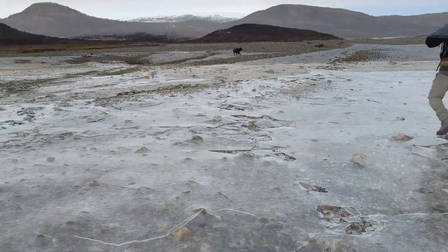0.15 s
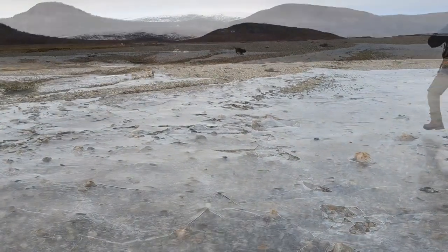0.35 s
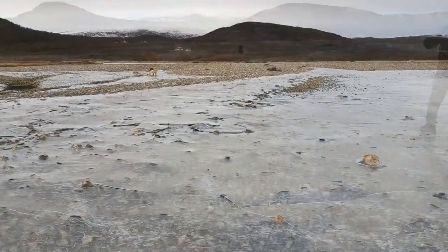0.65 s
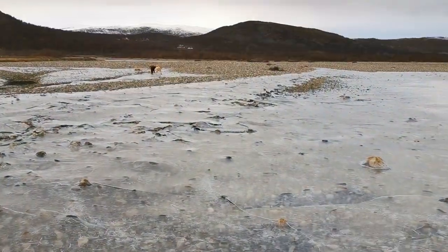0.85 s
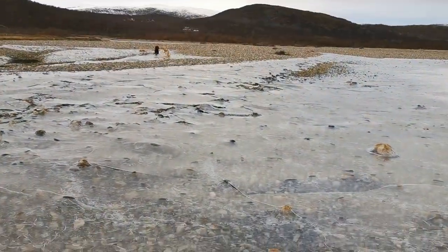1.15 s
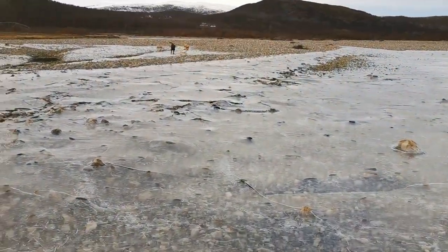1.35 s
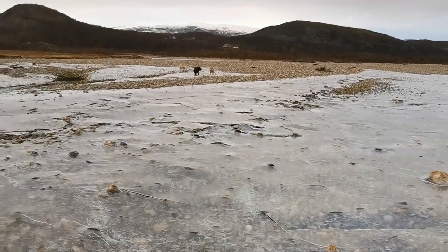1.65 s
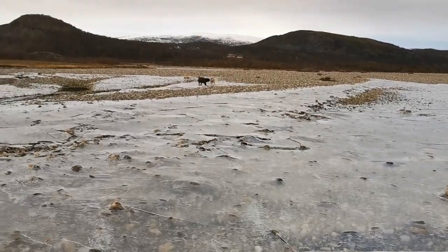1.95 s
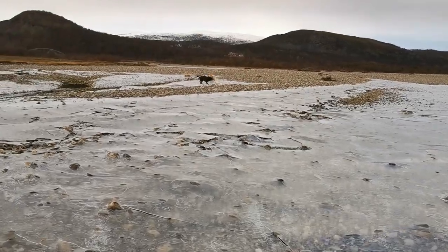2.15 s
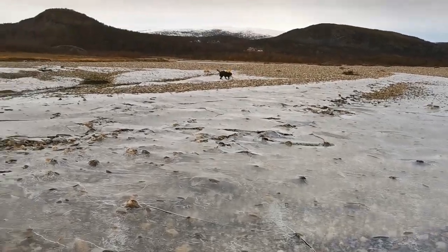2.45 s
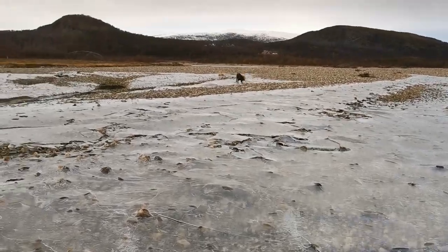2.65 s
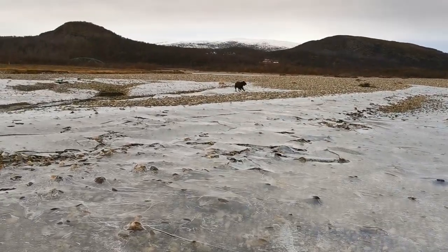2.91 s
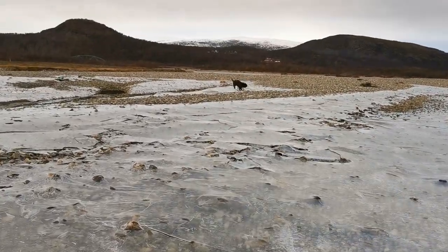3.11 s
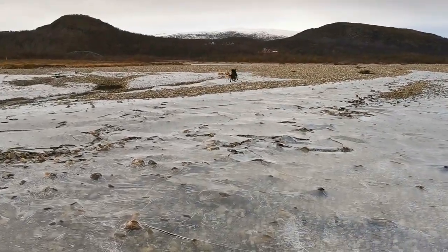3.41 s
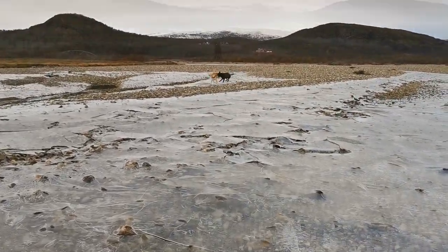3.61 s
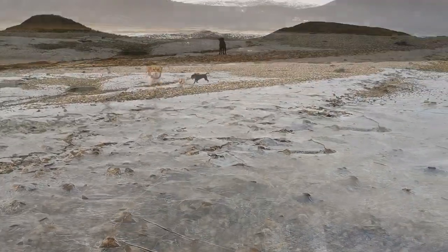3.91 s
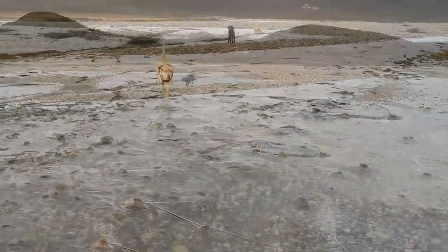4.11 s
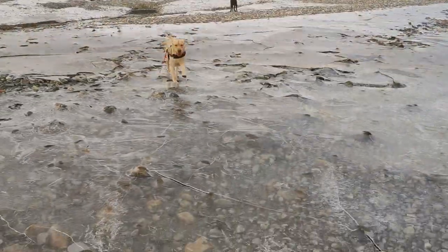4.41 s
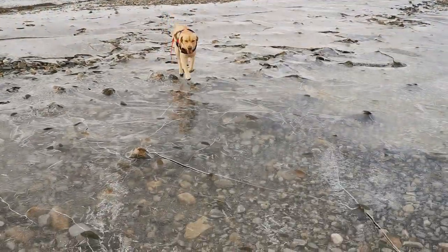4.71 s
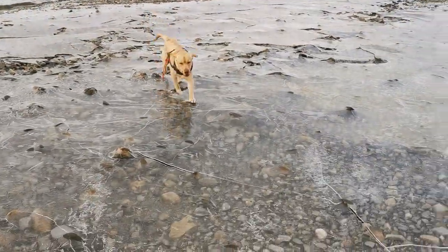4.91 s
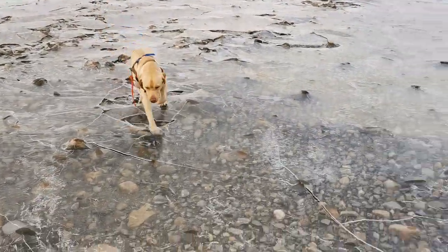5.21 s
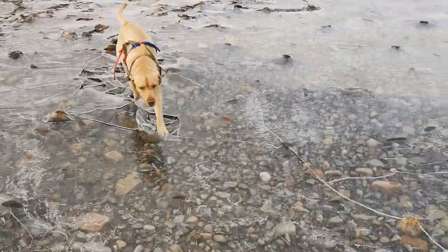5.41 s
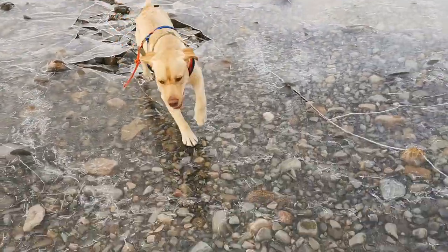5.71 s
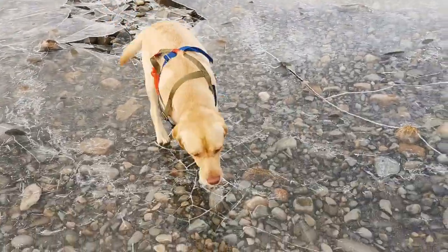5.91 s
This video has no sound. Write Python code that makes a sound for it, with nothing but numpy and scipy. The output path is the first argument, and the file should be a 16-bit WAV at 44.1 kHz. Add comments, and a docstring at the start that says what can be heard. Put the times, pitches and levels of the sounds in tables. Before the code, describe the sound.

On an open river flat, sharp ice snaps and slow crunching treads give way to lighter, brittle, ringing pawsteps breaking through the sheet.

```python
"""On an open river flat, boots break through thin shell ice; then a dog trots over it, cracking it with its paws.
Each break is a snap of noise, a thud of fading sine waves and a low boom from the hollow under the sheet.
Crushed ice is thousands of random ticks and tiny ringing chips, louder whenever a foot presses down.
High noise fizzes, splinters tick, water gulps, and a light wind brushes a hand-held camera's two microphone ports."""
import sys
import numpy as np
from scipy import signal
from scipy.fft import rfft, irfft, next_fast_len
from scipy.io import wavfile
from scipy.ndimage import uniform_filter1d, map_coordinates

SR = 44100
rng = np.random.default_rng(int(sys.argv[2]) if len(sys.argv) > 2 else 0)


def file_out(sig):
    """Save sig as 16-bit WAV at sys.argv[1]."""
    # one column per channel
    cols = np.atleast_2d(sig).T
    # limit, then scale
    lim = np.clip(cols, -1, 1)
    pcm = np.round(lim * 32767).astype(np.int16)
    wavfile.write(sys.argv[1], SR, pcm)


N = 267246  # length in samples

# The sheet gives way: t/s, relative thud level/dB, f/Hz, boom of the hollow relative to the thud/dB
BREAKS = [(0.068, -38.5, 99, 11.5), (0.388, -27.5, 270, -18), (1.347, -8.5, 294, -1.5),
          (1.839, -14.5, 174, -17), (2.109, -18, 242, -11), (2.212, -25.5, 230, -14),
          (2.239, -21.5, 205, -16), (2.408, -14, 189, -13), (3.449, -9.5, 269, -5), (3.507, -14, 153, -7),
          (4.927, -25, 223, -34), (5.036, -22.5, 197, -24), (5.07, -23, 176, -22), (5.321, -26, 281, -22),
          (5.5, -24, 264, -17), (5.719, -21.5, 156, -11), (5.767, -23.5, 209, -6), (5.804, -29, 113, -11),
          (5.893, -21.5, 296, 0.5), (5.986, -17, 153.6, -27)]
# Single cracks, loud and faint: t/s, relative level/dB, f/Hz of the broken piece
CRACKS = [(0.223, -28.5, 1410), (0.454, -22, 705), (0.672, -26, 4230), (0.712, -24, 2140),
          (0.833, -23.5, 1380), (0.873, -26, 1000), (1.26, -25.5, 1280), (1.293, -25.5, 1400),
          (1.324, -24, 1570), (1.347, -8.5, 4200), (1.364, -17.5, 520), (1.377, -9, 1190),
          (1.434, -18, 3670), (1.455, -13, 1950), (1.607, -18, 1090), (1.669, -23, 1180),
          (1.772, -24, 2260), (1.84, -9.5, 3880), (1.8555, -14.5, 3020), (1.865, -11.5, 4010),
          (1.8745, -11.5, 3900), (1.927, -14, 3150), (1.955, -21, 4300), (2.043, -21.5, 1450),
          (2.108, -18.5, 4040), (2.212, -25.5, 3950), (2.282, -26, 1080), (2.353, -23, 1420),
          (2.407, -16, 680), (2.434, -11, 1020), (2.467, -16.5, 1570), (2.575, -26, 2900),
          (2.668, -24.5, 810), (2.712, -19.5, 3240), (2.74, -30, 3340), (2.802, -25.5, 2170),
          (2.906, -26.5, 880), (3.005, -24.5, 2520), (3.116, -36, 2720), (3.147, -29.5, 3560),
          (3.247, -34.5, 3960), (3.406, -24.5, 3470), (3.468, -16, 4250), (3.517, -14, 436),
          (3.512, -16, 2430), (3.549, -17, 1290), (3.599, -15, 4050), (3.669, -21, 3800),
          (3.696, -16, 4460), (3.736, -22.5, 2510), (3.882, -28, 2160), (3.896, -26, 2570),
          (4.075, -31, 2560), (4.1, -38, 4470), (4.42, -30, 3360), (4.516, -29, 4770), (4.635, -26, 4640),
          (4.925, -19, 4030), (4.978, -22, 4200), (5.034, -23, 3030), (5.071, -21.5, 3920),
          (5.115, -21, 4130), (5.14, -22.5, 1110), (5.175, -23, 2090), (5.247, -16.5, 3100),
          (5.288, -21.5, 2980), (5.42, -21.5, 2100), (5.323, -14, 3380), (5.365, -17, 3250),
          (5.379, -19.5, 2330), (5.513, -16.5, 3660), (5.535, -20, 3860), (5.565, -24, 3150),
          (5.615, -15.5, 3300), (5.646, -24, 3290), (5.716, -13.5, 3940), (5.795, -19.5, 4400),
          (5.817, -20, 3930), (5.873, -13.5, 4430), (5.932, -24, 4880), (5.965, -18, 4520)]
# Ways the sheet bends and rings: multiple of the break's f, level/dB
SHEET_MODES = [(0.552, -26), (1.002, 9), (1.499, 3.5), (2.1, -4), (3.2, -5)]
# Tone colour of ice under a boot: f/Hz, relative level/dB
BOOT_ICE = [(200, -11.5), (390, -5.5), (1600, -5.5), (2200, -7.5), (3200, -5.5), (4600, -4), (5600, -13),
            (7500, -21.5), (9700, -35), (12000, -31.5), (16000, -36)]
# Tone colour of ice under a paw: f/Hz, relative level/dB
PAW_ICE = [(200, -20), (400, -13.5), (540, 1), (820, -7.5), (1120, -1.5), (1600, -5), (2100, -2.5),
           (3300, 0.5), (4600, 4.5), (5500, -8), (7500, -16.5), (9500, -26), (12000, -21), (16000, -32.5)]
# Tone colour of plates rocking over the hollow: f/Hz, relative level/dB
HOLLOW = [(25, -24.5), (70, -13), (115, -1), (200, 1), (290, 2), (380, -3.5), (550, -14), (1000, -47.5)]
# Tone colour of the quiet air: f/Hz, relative level/dB
AIR = [(35, -32), (60, 0), (301, 1), (417, -7), (1000, -8.5), (4030, -10.5), (8510, -31), (16000, -30)]
# Tone colour of rime, the crust of frost: f/Hz, relative level/dB
RIME = [(3000, -17), (4800, 3.5), (8500, -2.5), (10500, -4.5), (15500, -8.5)]
# Tone colour of flying splinters: f/Hz, relative level/dB
SPRAY = [(9000, 7.8), (11500, 2.8), (16000, 1.5)]
# Tone colour of wind on the ports: f/Hz, relative level/dB
BUFFET = [(15, -6.5), (40, -1), (140, -15.5), (400, -92)]
# How alike left and right sound: f/Hz, likeness 0-1
ALIKE = [(300, .99), (1200, .94), (2200, .62), (6000, .3), (14000, .2)]
# Balance of the boots' side: f/Hz, left minus right level/dB
BOOT_SIDE = [(700, 3.3), (1100, 0), (1800, -6.5), (2400, -5), (3600, -9), (5500, -5), (7000, -6), (9500, 0)]
# Balance of the dog's side: f/Hz, left minus right level/dB
PAW_SIDE = [(400, -2.5), (1700, -2), (2500, -4.5), (4500, -10), (7500, -7.5), (11000, -2)]
# Echo off the person holding the camera: t/s, delay/ms, strength 0-1
BODY_ECHO = [(3.7, 1.02, .2), (4.3, 1, .24), (5.3, .84, .18)]
# A foot bears down on the rubble: t/s, relative crunch level/dB, time from touch to release/s,
# time to fade 60 dB/s, relative level of rocking plates/dB, treble minus bass/dB
TREADS = [(0.001, -47, 0.046, 0.25, -59, -6), (0.315, -51, 0.0072, 0.27, -58, 1),
          (0.392, -38, 0.14, 0.069, -32.5, 2), (0.465, -28.5, 0.072, 0.65, -45, -1.5),
          (0.661, -32, 0.062, 0.2, -41, 1), (0.822, -39, 0.018, 0.57, -41, -6.5),
          (0.951, -51.5, 0.078, 0.46, -59, 4.5), (1.081, -58, 0.29, 0.28, -46.5, -7),
          (1.343, -23, 0.068, 0.061, -26.5, 2), (1.427, -29.5, 0.015, 0.7, -42, -7),
          (1.525, -34, 0.11, 0.38, -43, 2), (1.839, -19, 0.0065, 0.22, -31, -8),
          (1.905, -31, 0.023, 0.65, -58, -2), (2.103, -32.5, 0.016, 0.19, -34.5, -0.5),
          (2.209, -33, 0.011, .15, -29.5, -6), (2.276, -43.5, 0.0068, 0.74, -44, 0),
          (2.406, -24.5, 0.0065, 0.11, -24, -1), (2.435, -23, 0.04, 0.19, -49, -5.5),
          (2.663, -32, 0.029, 0.25, -38, -0.5), (2.887, -40, 0.065, 0.17, -43, 2.5),
          (3.399, -40, 0.0091, 0.063, -48, -4), (3.448, -28, 0.029, 0.19, -23.5, 0.5),
          (3.508, -26, 0.1, 0.088, -34.5, -5), (3.638, -37.5, 0.015, 0.47, -47, 1),
          (3.856, -42.5, 0.026, 0.24, -49, 10.5), (4.02, -41, 0.018, 1.8, -61, 2.5),
          (4.133, -38.5, 0.027, 0.11, -58, 1.5), (4.191, -40, 0.059, 0.54, -82, -1),
          (4.292, -46, 0.081, 0.18, -83, -1), (4.422, -41, 0.025, 0.39, -64, -10),
          (4.495, -37, 0.078, 0.93, -54.5, -8), (4.629, -37.5, 0.1, 0.23, -52, -10),
          (4.867, -37.5, 0.041, .45, -72, -4), (4.923, -34.5, 0.032, 0.77, -46.5, 2),
          (5.029, -30.5, 0.18, 0.34, -39.5, -2), (5.255, -27.5, 0.062, 0.42, -42.5, -3.5),
          (5.322, -31, 0.042, 0.14, -37, 4), (5.364, -26, 0.026, 0.76, -60, -5),
          (5.496, -25.5, 0.04, 0.53, -37, -1), (5.597, -26.5, 0.08, 0.22, -58, -3.5),
          (5.709, -30.5, 0.01, 0.31, -42, -3), (5.751, -35.5, 0.14, 0.47, -40.5, 1.5),
          (5.878, -28, 0.022, 0.11, -27.5, -2), (5.961, -34.5, 0.028, 0.6, -36.5, -11.5)]
# A fizz of high noise swells and fades: t/s, level/dB, rise/s, time from start to release/s,
# time to fade 60 dB/s, f/Hz of the middle of the fizz hump
FIZZES = [(0.008, -52.5, 0.0056, 0.034, 0.5, 7600), (0.386, -59, 0.016, 0.12, 0.38, 12600),
          (0.478, -44, 0.059, 0.082, 0.1, 6200), (0.571, -45.5, 0.01, 0.12, 0.24, 7700),
          (4.137, -59.5, 0.081, 0.083, 0.61, 12500), (4.493, -51.5, 0.0052, 0.027, 0.21, 12800),
          (5.787, -35, 0.012, 0.03, 0.19, 5500), (5.863, -25.5, 0.0047, 0.036, 0.071, 5260),
          (5.961, -28, 0.0027, 0.036, 0.14, 5200)]
# Puffs of wind: t/s of the peak, relative level/dB
PUFFS = [(0.075, -47), (0.55, -47), (3.85, -43.5), (4.259, -44), (4.59, -51)]
# Water gulps under the broken sheet: t/s, relative level/dB, starting f/Hz
GULPS = [(2.482, -20, 794), (2.548, -22, 816), (3.603, -18.5, 756), (3.705, -27, 1370)]
# Tiny crystals snap off the rime: t/s, peak level/dB
PINS = [(0.024, -35), (0.047, -40), (0.079, -36), (0.142, -36.5), (0.182, -46), (2.909, -30),
        (4.637, -27.5), (4.87, -30.5)]
# Resonances of the whole plate that the dog first crosses: f/Hz, level/dB
FAR_PLATE = [(1140, 3.5), (2080, -2), (2760, -2.5), (3540, -8.5)]

# Names ending in T60 or t60 are the seconds a sound takes to fade by 60 dB.
DOG_ENTERS, LEAVES_PLATE_S = 4.02, 4.84  # s: the dog's first step; it leaves the first plate
PRESS_S = 0.0053  # s for the weight to come on
SETTLE_DB, SETTLE_T60 = -15.5, 1  # shards keep shifting after each tread
CROSSFADE_DB = -28  # the load at which the two crushed-ice textures are mixed equally
ROCK_RISE_S, ROCK_HOLD, ROCK_RELEASE = 0.0035, 0.54, 2.13  # the last two multiply the tread's own times
BOOM_HZ, SHEET_LOW_HZ = 117.4, 71  # the air pocket; the sheet radiates little below the second
PIN_T60, SPRAY_DB, SPRAY_T60 = 0.017, -27, 0.099
FIZZ_DB, FIZZ_WIDTH_OCTAVES = 15, 0.47  # height and half-width of the fizz hump
PUFF_S, BREEZE_DB = 0.098, -59.5  # half-width of a puff; relative level of the breeze between puffs
LAG_FROM_HZ = 970  # deeper sounds reach both ports together
MIC_LOW_HZ, TOP_HZ = 30.2, 16000  # bass roll-off and upper limit


def boots():
    """Heavy, slow treads close to the camera break the sheet and crush its pieces."""
    treads, sheet_breaks, snaps = ([r for r in rows if r[0] < DOG_ENTERS] for rows in (TREADS, BREAKS, CRACKS))
    sparse = rubble(BOOT_ICE, rate=600, spread_db=4.5, chip_db=-6)
    dense = rubble(BOOT_ICE, rate=2000, spread_db=3.8, chip_db=-6)
    sound = crunch(treads, sparse, dense, db=0)
    sound += gulps(t60=0.042, attack_s=0.0013, glide_per_s=2.05)
    sound += strays(treads, BOOT_ICE, db=-17.0, rate=36, t60=0.93)
    sound += breaks(sheet_breaks, thud_db=-2, thud_t60=0.052, attack_s=0.0015, boom_t60=0.081)
    sound += slabs(sheet_breaks, db=-24, hold_s=0.026, t60=0.16)
    sound += cracks(snaps, BOOT_ICE, gain_db=3, rise_s=.0003, snap_t60=.008, tail_t60=.03,
                    ring_db=-4.5, ring_q=6)
    return ports(sound, BOOT_SIDE, lag_ms=0.071)


def dog():
    """Quick, light paws, heard first on the left: brittle rubble with narrow, shifting resonances."""
    treads, sheet_breaks, snaps = ([r for r in rows if r[0] >= DOG_ENTERS] for rows in (TREADS, BREAKS, CRACKS))
    fine = rubble(PAW_ICE, rate=1500, spread_db=3.3, chip_db=-4)
    coarse = rubble(PAW_ICE, rate=600, spread_db=4, chip_db=-4)
    both = patches(np.vstack([fine, coarse]), depth_db=3.2, size=768, count=24)
    fine, coarse = both.reshape(2, 2, N)
    sound = far_plate(crunch(treads, fine, coarse, db=-1.0), direct_db=-2.5, q=10.8)
    sound += cracks(snaps, PAW_ICE, gain_db=4.5, rise_s=.001, snap_t60=.03, tail_t60=.08,
                    ring_db=-4.5, ring_q=12)
    sound += breaks(sheet_breaks, thud_db=-2.0, thud_t60=0.11, attack_s=0.0033, boom_t60=0.38)
    return ports(sound, PAW_SIDE, lag_ms=-0.34)


def breaks(rows, thud_db, thud_t60, attack_s, boom_t60):
    """The sheet drops, rings as it bends and pumps the air pocket beneath it."""
    thuds, t = np.zeros((2, N)), np.arange(SR // 3) / SR
    onset = 1 - np.exp(-t / attack_s)  # a hard sole drops the sheet at once, a soft paw more gently
    for s, db, hz, boom_db in rows:
        ring = np.zeros(len(t))
        for k, level in SHEET_MODES:
            fade = amp(level + rng.normal(0, 1) - 60 * t * np.sqrt(k) / thud_t60)  # high modes die sooner
            ring += onset * fade * np.sin(2 * np.pi * hz * k * t)
        boom = onset * amp(boom_db - 60 * t / boom_t60) * np.sin(2 * np.pi * BOOM_HZ * t)
        add(thuds, s, -amp(db + thud_db) * (ring / np.abs(ring).max() + boom) * [[1], [0]])
    return filtered(thuds, lambda hz: 1j * hz / (SHEET_LOW_HZ + 1j * hz))


def cracks(rows, spectrum, gain_db, rise_s, snap_t60, tail_t60, ring_db, ring_q):
    """A crack is a sharp snap and a scatter across the sheet, both resonating in the broken piece."""
    out, t = np.zeros((2, N)), np.arange(SR // 12) / SR
    for s, db, hz in rows:
        scatter = amp(.5 * db - 60 * t / tail_t60)  # small cracks stay dry, big ones scatter
        force = np.minimum(t / rise_s, 1) * (amp(-60 * t / snap_t60) + scatter)
        snap = coloured(rng.standard_normal((2, len(t))) * force, spectrum)
        ring = unit(signal.lfilter(*signal.iirpeak(hz, ring_q, SR), snap))
        sound = unit(snap) + amp(ring_db - .3 * db) * ring  # small pieces fall free and ring more clearly
        add(out, s, amp(db + gain_db) * sound / np.abs(sound).max())
    return out


def crunch(rows, under_light, under_heavy, db):
    """The load crossfades two crushed-ice textures; flakes sound low, splinters high; then all settles."""
    low, high = np.zeros((2, N))
    for s, level_db, hold_s, t60, _, tilt_db in rows:
        load = press(s, PRESS_S, hold_s, t60)
        settling = amp(SETTLE_DB) * press(s, PRESS_S, hold_s, SETTLE_T60)
        power = amp(level_db) ** 2 * (load ** 2 + settling ** 2)
        low += power / amp(tilt_db)
        high += power * amp(tilt_db)
    # under boots from sparse to dense, under paws from fine and dense to coarser
    share = (low + high) / (low + high + 2 * amp(CROSSFADE_DB) ** 2)
    texture = np.sqrt(1 - share) * under_light + np.sqrt(share) * under_heavy
    flakes = filtered(texture, lambda hz: 1 / (1 + (hz / 2200) ** 4))
    return amp(db) * (flakes * np.sqrt(low) + (texture - flakes) * np.sqrt(high))


def rubble(spectrum, rate, spread_db, chip_db):
    """Crushed ice: dry ticks, briefly ringing chips and a few faint clinking shards."""
    ticks = crackle(rate, spread_db, life_ms=.45)
    chips = grains(rate, spread_db, life_ms=0.63, low_hz=413, high_hz=5550, size=200)
    clinks = amp(-12) * grains(rate=150, spread_db=1.8, life_ms=5, low_hz=700, high_hz=4800, size=1500)
    crushed = patches(ticks + amp(chip_db) * chips, depth_db=2.4, size=256, count=9)
    mixture = crushed * clumps(rate=70, life_s=.005) + clinks
    return even(coloured(mixture, spectrum), seconds=0.043)


def slabs(rows, db, hold_s, t60):
    """After each break the thick edges of the hole grind past each other: a packed, low crunch."""
    grinding = grains(rate=900, spread_db=3, life_ms=1.6, low_hz=330, high_hz=950, size=500)
    power = sum((amp(thud_db) * press(s, PRESS_S, hold_s, t60)) ** 2 for s, thud_db, *_ in rows)
    return amp(db) * even(grinding, seconds=.02) * np.sqrt(power)


def far_plate(x, direct_db, q):
    """While it still holds, the plate under the paws sings along in a few steady bands."""
    sung = amp(direct_db) * x
    for hz, db in FAR_PLATE:
        sung = sung + amp(db) * signal.lfilter(*signal.iirpeak(hz, q, SR), x)
    return np.where(np.arange(N) / SR < LEAVES_PLATE_S, sung, x)


def gulps(t60, attack_s, glide_per_s):
    """A pocket of air escapes through the water and rings as a bubble, its pitch creeping up."""
    out, t = np.zeros((2, N)), np.arange(SR // 8) / SR
    for s, db, hz in GULPS:
        ring = np.sin(2 * np.pi * hz * t * (1 + glide_per_s * t / 2)) * (1 - np.exp(-t / attack_s))
        add(out, s, amp(db - 60 * t / t60) * ring * [[1], [0]])
    return out


def strays(rows, spectrum, db, rate, t60):
    """Loose shards tick one by one during and after each tread."""
    ticks = crackle(rate, spread_db=3.5, life_ms=.8)
    ticks = ticks + grains(rate, spread_db=4, life_ms=2.2, low_hz=900, high_hz=4800, size=600)
    unrest = np.max([amp(level_db) * press(s, PRESS_S, hold_s, t60) for s, level_db, hold_s, *_ in rows], axis=0)
    return amp(db) * unrest * unit(coloured(ticks, spectrum))


def high_fizz():
    """A fizz of high noise swells and fades: fine crackle, boosted around one pitch region each time."""
    crackling, out = coloured(crackle(800, spread_db=4, life_ms=.7), RIME), np.zeros((2, N))
    for s, db, rise_s, hold_s, t60, centre_hz in FIZZES:
        octaves = lambda hz: np.log2((hz + 1) / centre_hz)
        hump = lambda hz: amp(FIZZ_DB * np.exp(-(octaves(hz) / FIZZ_WIDTH_OCTAVES) ** 2))
        out += amp(db) * press(s, rise_s, hold_s, t60) * unit(filtered(crackling, hump))
    return out


def splinters():
    """Pin-sharp ticks of rime, and a spray of the finest splinters whenever a boot breaks the sheet."""
    out, t = np.zeros((2, N)), np.arange(SR // 8) / SR
    pins = [(s, db, PIN_T60, RIME) for s, db in PINS]
    sprays = [(s, SPRAY_DB + db / 2, SPRAY_T60, SPRAY) for s, db, *_ in BREAKS if s < DOG_ENTERS]
    for s, db, t60, spectrum in pins + sprays:
        burst = coloured(rng.standard_normal((2, len(t))) * amp(-60 * t / t60), spectrum)
        add(out, s, amp(db) * burst / np.abs(burst).max())
    return out


def rocking(db, ring_db):
    """Every tread sets loose plates knocking and wobbling, humming briefly over the hollow under them."""
    knocks = crackle(250, spread_db=4, life_ms=1.5)
    hum = grains(rate=62, spread_db=0.0, life_ms=6.7, low_hz=106.6, high_hz=262.0, size=4000)
    power = np.zeros(N)
    for s, _, hold_s, t60, rock_db, _ in TREADS:
        motion = press(s, ROCK_RISE_S, ROCK_HOLD * hold_s, ROCK_RELEASE * t60)
        power += (amp(rock_db) * motion) ** 2
    wobble = even(coloured(knocks + amp(ring_db) * hum, HOLLOW), seconds=0.013)
    return amp(db) * np.sqrt(power) * wobble


def echoes(x):
    """A close reflection colours the sound faintly; as its delay shortens, that colour rises in pitch."""
    n, (s, delay_ms, strength) = np.arange(N), np.transpose(BODY_ECHO)
    read_at = n - np.interp(n / SR, s, delay_ms) * SR / 1000
    late = np.array([map_coordinates(side, [read_at], order=3) for side in x])
    return x + np.interp(n / SR, s, strength) * late


def air():
    """A faint hush over the flat, and a breeze with short puffs that brushes the two ports unequally."""
    noise = lambda spectrum: unit(filtered(rng.standard_normal((2, N)), lambda hz: amp(along(spectrum, hz))))
    hush, buffet = noise(AIR), noise(BUFFET)
    t = np.arange(N) / SR
    wind = amp(BREEZE_DB) + sum(amp(db) * np.exp(-((t - s) / PUFF_S) ** 2) for s, db in PUFFS)
    breeze = wind * amp([[0], [-6]]) * (buffet + .5 * buffet[::-1])  # right port softer
    return amp(-60.5) * ports(hush, BOOT_SIDE, lag_ms=0) + breeze


def ports(pair, side, lag_ms):
    """Two signals become left and right, most alike in the bass; the camera body shades one port."""
    turn = lambda hz: np.arccos(np.clip(along(ALIKE, hz), -1, 1)) / 2
    mid, apart = filtered(pair, lambda hz: np.array([np.cos(turn(hz)), np.sin(turn(hz))]))
    half = np.array([[.5], [-.5]])
    lag_s = lambda hz: lag_ms / 1000 * (1 - 1 / (1 + (hz / LAG_FROM_HZ) ** 6))  # positive: left comes later
    delay = lambda hz: np.exp(-2j * np.pi * hz * half * lag_s(hz))
    return filtered(np.array([mid + apart, mid - apart]), lambda hz: amp(half * along(side, hz)) * delay(hz))


def press(s, rise_s, hold_s, t60):
    """Attack, hold and release of a load or sound that comes on at time s."""
    t = np.maximum(np.arange(N) / SR - s, 0)
    return np.minimum(t / rise_s, 1) * amp(-60 * np.maximum(t - hold_s, 0) / t60)


def grains(rate, spread_db, life_ms, low_hz, high_hz, size):
    """Tiny fractures at random times, each a fading ring with its own pitch, life and strength."""
    when, pitch, strength, life, *phase = rng.random((int(rate * N / SR), 6)).T
    t = np.arange(size) / SR
    tau = (life_ms / 1000 * 2 ** (2 * life - 1))[:, None]  # half to twice the given life
    hz = (low_hz + pitch * (high_hz - low_hz))[:, None]
    fade = amp(-spread_db * np.log(strength + .02))[:, None] * np.exp(-t / tau) / np.sqrt(tau)
    index = ((when * N).astype(int)[:, None] + np.arange(size)).ravel()
    sides = []
    for p in phase:  # two sets of phases, one a channel
        rings = fade * np.sin(2 * np.pi * (hz * t + p[:, None]))
        sides.append(np.bincount(index, rings.ravel(), N)[:N])
    return unit(np.array(sides))


def crackle(rate, spread_db, life_ms):
    """Toneless ticks: sudden bursts of noise of uneven strength that die away within milliseconds."""
    when, strength = rng.random((int(rate * N / SR), 2)).T
    kicks = np.bincount((when * N).astype(int), amp(-spread_db * np.log(strength + .02)) ** 2, N)
    energy = signal.lfilter([1], [1, -np.exp(-2000 / (life_ms * SR))], kicks)
    return unit(np.sqrt(energy) * rng.standard_normal((2, N)))


def clumps(rate, life_s):
    """One fracture sets off its neighbours: the grains come in sudden, short flurries."""
    kicks = (rng.random(N) < rate / SR) * rng.exponential(size=N)
    energy = signal.lfilter([1], [1, -np.exp(-1 / (life_s * SR))], kicks)
    return np.sqrt(1 + energy / energy.mean())


def patches(x, depth_db, size, count):
    """Pieces take turns to break, so the colour shifts; longer windows (size) give narrower resonances."""
    z = signal.stft(x, nperseg=size)[2]
    field = uniform_filter1d(rng.standard_normal(z.shape[1:]), size=3, axis=0)
    field = uniform_filter1d(field, size=count, axis=1)  # smooth each resonance over count frames
    return signal.istft(z * amp(depth_db * unit(field)), nperseg=size)[1][:, :N]


def even(x, seconds):
    """Keep the grain of a texture but hold its slower level near rms 1."""
    width = int(seconds * SR)
    power = np.abs(uniform_filter1d(uniform_filter1d(np.mean(x ** 2, 0), width), width))
    return x / np.sqrt(power + 1e-4 * power.mean())


def coloured(x, spectrum, size=2048):
    """Give x a tone colour without letting anything sound ahead of a click."""
    cepstrum = irfft(np.log(amp(along(spectrum, np.fft.rfftfreq(size, 1 / SR)))))
    fold = np.r_[1, np.full(size // 2 - 1, 2), 1, np.zeros(size // 2 - 1)]  # makes it minimum phase
    response = irfft(np.exp(rfft(cepstrum * fold)))
    return signal.fftconvolve(x, response[None], axes=1)[:, :x.shape[1]]


def filtered(x, response):
    """Multiply the frequencies of x by a response, which may also shift their phase."""
    size = x.shape[-1]
    m = next_fast_len(size + 4096)  # spare room so the end does not wrap onto the start
    return irfft(rfft(x, m) * response(np.fft.rfftfreq(m, 1 / SR)), m)[..., :size]


def along(points, hz):
    """Read between (f/Hz, value) points on a log axis."""
    f, v = np.transpose(points)
    return np.interp(np.log(hz + 1), np.log(f + 1), v)


def add(track, s, sound):
    """Mix a sound in at time s."""
    part = track[:, max(round(s * SR), 0):][:, :sound.shape[1]]
    part += sound[:, :part.shape[1]]


def amp(db):
    """Decibels to gain."""
    return 10 ** (np.asarray(db) / 20)


def unit(x):
    """Scale to rms 1."""
    return x / np.sqrt(np.mean(x ** 2) + 1e-20)


def scene():
    """Ice and wind on the open flat, with no walls to answer."""
    ice = echoes(boots() + dog() + high_fizz() + splinters())
    plates = ports(rocking(db=1.0, ring_db=-16.5), BOOT_SIDE, lag_ms=0)
    return ice + plates + air()


def record(dry):
    """The camera thins the deepest bass, rounds off the loudest peaks and keeps nothing above its limit."""
    thin = filtered(dry, lambda hz: 1j * hz / (MIC_LOW_HZ + 1j * hz))
    rounded = thin / (1 + np.abs(thin / .75) ** 6) ** (1 / 6)
    return filtered(rounded, lambda hz: hz < TOP_HZ)


dry = scene()
out = record(dry)
file_out(out)
```